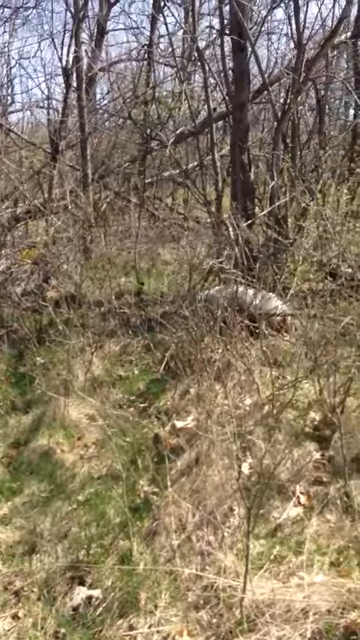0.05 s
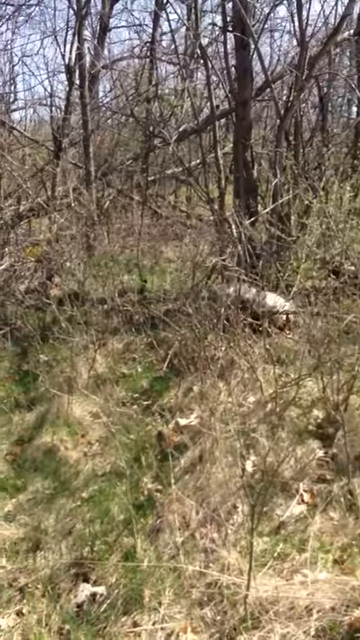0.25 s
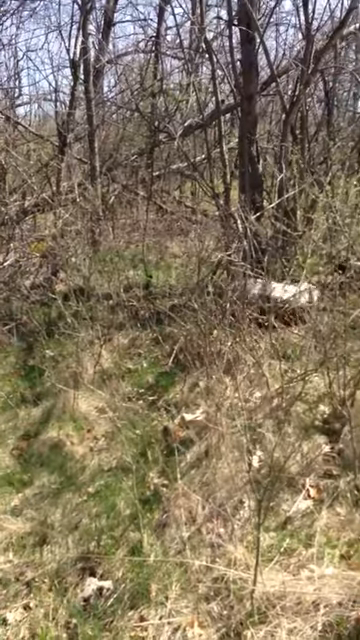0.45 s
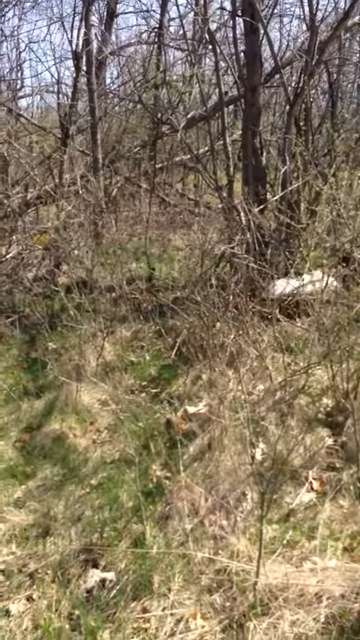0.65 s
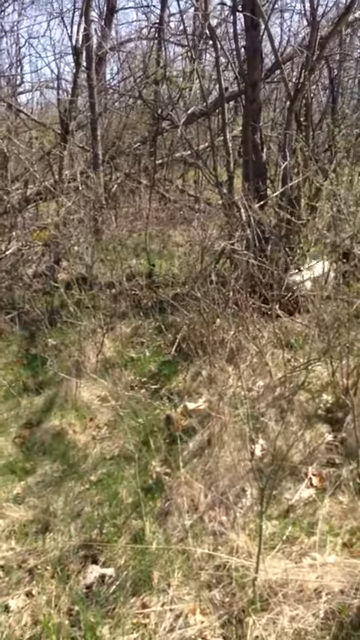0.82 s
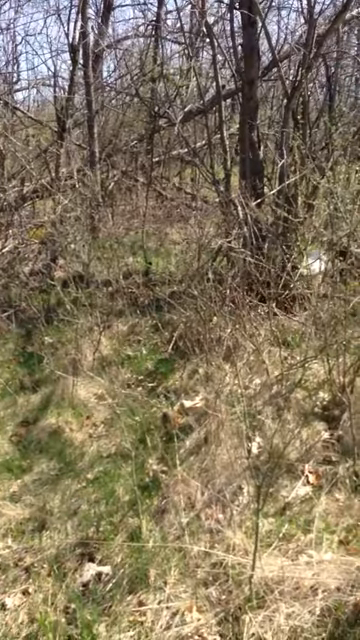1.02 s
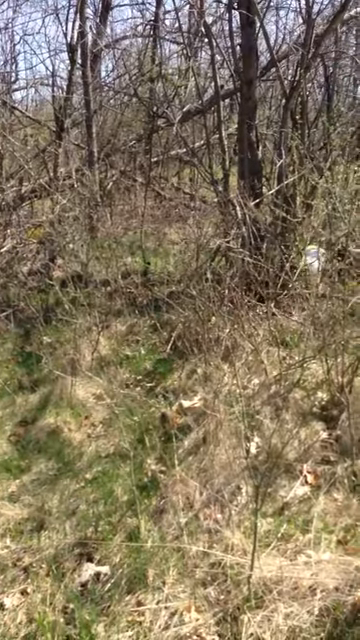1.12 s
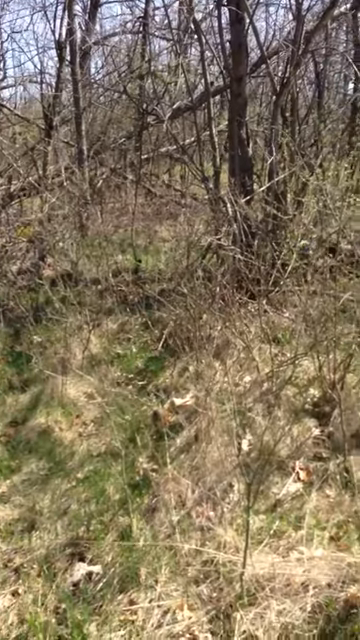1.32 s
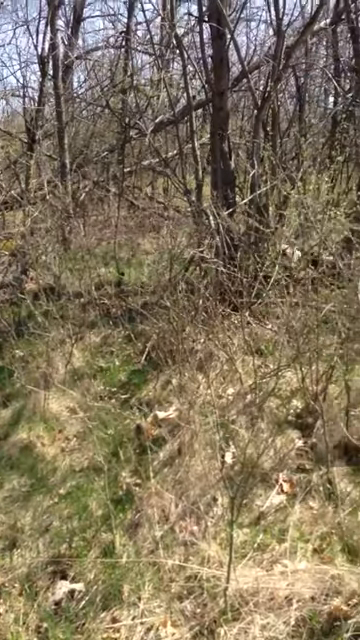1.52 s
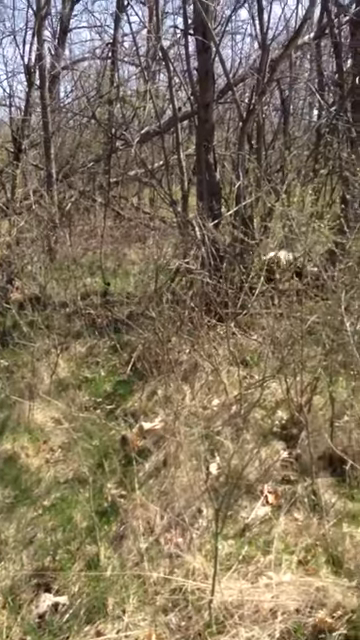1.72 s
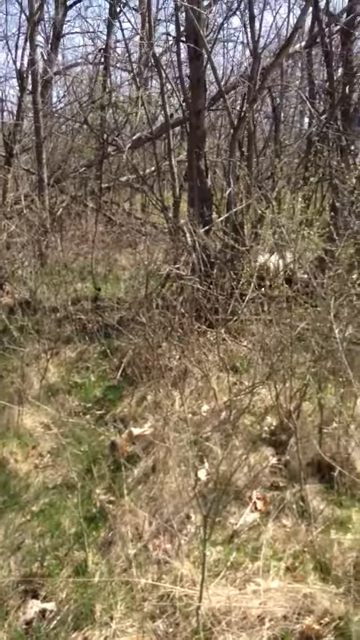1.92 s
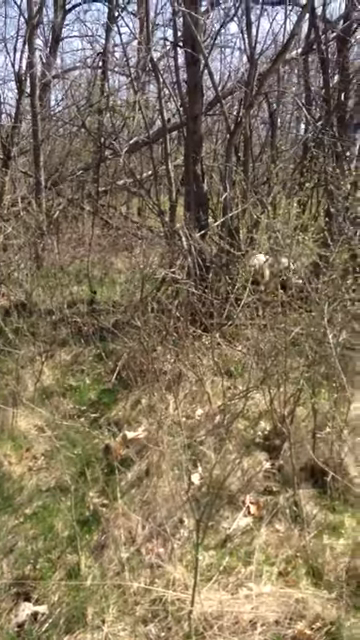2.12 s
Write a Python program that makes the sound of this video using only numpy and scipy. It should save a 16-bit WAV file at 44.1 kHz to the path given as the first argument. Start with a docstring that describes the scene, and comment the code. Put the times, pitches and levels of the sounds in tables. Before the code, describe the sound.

Dry brush crackles as a dog moves through it outdoors; a loud stick snap comes early, then a dense burst of twig ticks and crunches, thinning to sparse rustles over faint wind, heard from some distance.

```python
"""Dry leaves crackle in swells as a dog pushes through brush, each swell a stream of tiny decaying sines.
Thin twigs tick as cracks with a short ring, and one stick snaps as a set of damped modes with splinters.
Stiff stalks crunch in coarser grains; stems add a tail of scattered noise to all these breaking sounds.
Soft thumps are brief low tones, grass scuffs are dull noise, and light wind is fluttering low noise."""
import sys
import numpy as np
from scipy import signal
from scipy.fft import rfft, irfft
from scipy.io import wavfile
from scipy.ndimage import uniform_filter1d

SR = 44100
rng = np.random.default_rng(int(sys.argv[2]) if len(sys.argv) > 2 else 0)


def store_wav(level_fs):
    """Save 16-bit WAV to argv[1]."""
    pcm = np.round(np.clip(np.atleast_2d(level_fs), -1, 1) * 32767)
    wavfile.write(sys.argv[1], SR, pcm.T.astype(np.int16))


N = 94815  # length in samples

# Pushes through dry leaves: peak_s, rise_s, fall_s, level_db, treble_db (treble relative to level)
LEAF_PUSHES = [(0.028, 0.035, 0.04, -50, -1), (0.165, 0.078, 0.092, -56.5, 6.5),
               (0.325, 0.036, 0.038, -55, 2.5), (0.39, 0.011, 0.024, -54.5, 1.5),
               (0.56, 0.028, 0.039, -53, -2.5), (0.617, 0.0017, 0.0048, -40.5, -20),
               (0.642, 0.0083, 0.018, -43.5, -3), (0.683, 0.014, .01, -50, 0),
               (0.715, 0.04, 0.049, -48, -0.5), (0.779, 0.0053, 0.0098, -50, -1),
               (0.90, 0.035, .05, -51.5, 1), (0.968, 0.034, 0.028, -47, -4),
               (0.995, 0.015, 0.017, -46.5, 0.5), (1.101, 0.047, 0.03, -53, 5.5),
               (1.129, 0.031, 0.017, -52, 6), (1.314, 0.028, 0.025, -51.5, -0.5),
               (1.35, 0.018, .016, -52, -0.5), (1.45, 0.06, .025, -66, 15), (1.586, 0.056, 0.04, -53.5, 3),
               (1.776, 0.026, 0.025, -44.5, 2), (1.801, 0.015, 0.039, -46, -0.5),
               (1.855, 0.047, 0.049, -49.5, -0.5), (1.917, 0.013, 0.023, -51.5, -7),
               (2.09, 0.036, 0.056, -53.5, -3)]
# Ticking twigs: start_s, level_db (before TWIG_TRIM_DB), pitch_hz, decay_s
TWIG_TICKS = [(0.168, -39, 7000, .001), (0.5, -43, 7800, .0007), (0.529, -42, 3070, .0009),
              (0.6132, -30, 7550, .0009), (0.6178, -35.5, 4250, .0012), (0.6404, -31, 7250, .0008),
              (0.6467, -36, 5400, .0008), (0.655, -34, 6500, .0003), (.6683, -40, 4000, .0003),
              (0.6833, -31, 7600, 0.00027), (0.687, -32.5, 5030, 0.00026), (0.705, -36, 6050, .0007),
              (0.778, -43, 2300, 0.00075), (0.855, -31.5, 5700, .0007), (0.8762, -41, 7250, .0005),
              (0.902, -39, 7500, .0005), (0.9194, -36, 6840, .0003), (0.924, -37, 6900, .0004),
              (0.9803, -32, 5800, .0004), (0.991, -33, 6800, .0004), (0.998, -37, 8900, .0005),
              (1.449, -39, 6200, .0005), (1.71, -38, 7640, 0.0012), (1.778, -32.5, 4450, 0.00045),
              (1.83, -37, 4600, .0005), (1.917, -43.5, 7400, .0012), (2.033, -38.5, 11500, 0.00036),
              (2.059, -40, 6500, 0.00018), (2.085, -39.5, 5990, .0005), (2.132, -38, 4200, 0.00087)]
# Modes of the snapping stick: pitch_hz, level_db (before SNAP_DB), t60_s
STICK_MODES = [(540, -37, 0.014), (890, -28, 0.0062), (1764, -35.5, 0.027), (3030, -16.5, 0.0068),
               (4400, -12.5, 0.0085), (5420, -19.5, 0.017), (6140, 0, 0.003), (7640, -15.5, 0.0053),
               (10000, -12.5, 0.0039), (11430, -13, 0.004)]
# Stiff stalks giving way: peak_s, rise_s, fall_s, level_db, pitch_hz
STALK_CRUNCHES = [(.618, .002, .005, -44.5, 4200), (.644, 0.0089, .012, -49, 5300),
                  (.99, 0.022, .015, -49.5, 5200), (1.785, 0.023, .03, -50.5, 4500),
                  (1.835, .015, .035, -54, 5400)]
# Soft thumps on the turf: centre_s, pitch_hz, level_db, spread_s
TURF_THUMPS = [(.437, 285, -46, .0028), (.455, 191, -62, 0.0093), (.547, 169, -56, .005),
               (1.02, 181, -57, .008), (1.08, 185, -58.5, 0.014), (1.28, 165, -57, 0.0065)]
# Dull scuffs through the grass: centre_s, spread_s, level_db
GRASS_SCUFFS = [(0.488, 0.027, -62), (0.645, 0.047, -65.5), (1.16, .05, -68), (0.945, 0.051, -64.5),
                (1.803, 0.015, -58)]
# Spectrum of the dry leaves: frequency_hz, relative_level_db
LEAF_SPECTRUM = [(200, -27.5), (600, -11), (1200, -9.5), (2000, -7.5), (3000, -2.5), (4400, -1),
                 (5500, -0.5), (7100, .5), (8800, -3.5), (11500, -6), (15500, -13)]
# Spectrum of the crack of a twig: frequency_hz, relative_level_db
TWIG_CRACK_SPECTRUM = [(200, -32), (500, -11.5), (1200, -14.5), (2500, -2.5), (4500, 0.5), (6800, 0.5),
                       (8500, -4.5), (11000, 1.5), (15500, -12.5)]
# Spectrum of the stick's splintering fibres, sharing its resonances: frequency_hz, relative_level_db
FIBRE_SPECTRUM = [(200, -28), (500, -6), (1000, -7.5), (1300, -15), (1750, -5.5), (2200, -6.5), (3030, 0.5),
                  (3500, -5), (4420, 2), (4850, -3), (5410, 3.5), (7100, 3), (8500, -2.5), (11000, 2.5),
                  (15500, -10)]
# Spectrum of the brushed grass: frequency_hz, relative_level_db
GRASS_SPECTRUM = [(150, -9), (400, 0), (850, 1.5), (1400, -10), (2000, -3.5), (4000, -27)]
# Spectrum of the wind in the trees: frequency_hz, relative_level_db
WIND_SPECTRUM = [(25, -20), (60, -17), (85, -11), (130, 1.5), (185, 2.5), (260, -1), (380, -6), (600, -6.5),
                 (870, -3.5), (1400, -9), (2200, -13.5), (4500, -18), (7000, -14), (10000, -19),
                 (15500, -23)]

# Fracture grains: decay is in cycles of each grain's own pitch
GRAINS_PER_S, GRAIN_SPREAD_DB, GRAIN_DECAY_CYCLES = 8000, 3, 1.19
GRAIN_LOW_HZ, GRAIN_HIGH_HZ = 300, 16000
SCATTER_DB, SCATTER_S = -2, 0.01
# Leaves: STIR_DB is the motion that lasts between pushes
STIR_DB, TREBLE_HZ = -62.5, 8100
CLUSTERS_PER_S, CLUSTER_SPREAD_DB = 170, 1.2
# Twigs: the crack level is relative to the ring
TWIG_TRIM_DB, TWIG_CRACK_DB, TWIG_CRACK_S, TWIG_SCATTER_DB = -2, -6.5, 0.0004, -3
# Stick
SNAP_S, SNAP_DB, SNAP_ATTACK_S = 0.2228, -6, 0.00044
SPLINTER_DB, SPLINTER_RISE_S, SPLINTER_FADE_S = -27.5, 0.0029, 0.0063
SNAP_ECHO_DB, SNAP_ECHO_S = -44.5, 0.028
# Stalks: the skirt is the level an octave off the pitch
STALK_GRAINS_PER_S, STALK_SPREAD_DB, STALK_SKIRT_DB = 1500, 4.5, -18
WIND_DB, FLUTTER_DB, FLUTTER_PER_S = -60, 0.88, 35.05
LOW_CUT_HZ, TOP_HZ = 58, 15400


def undb(db):
    """The decibel law: amplitude grows tenfold for every 20 dB."""
    return 10 ** (np.asarray(db) / 20)


def unit(x):
    """Normalisation: scale a signal to an rms of 1."""
    return x / np.sqrt(np.mean(x ** 2))


def colour(x, points):
    """Spectral shaping: weight each frequency by a curve in dB over log frequency, then set rms to 1."""
    hz, db = np.array(points).T
    frequency = np.maximum(np.fft.rfftfreq(N, 1 / SR), 1)
    gain = undb(np.interp(np.log(frequency), np.log(hz), db))
    return unit(irfft(rfft(x) * gain, N))


def walk(rate):
    """Smoothed randomness: random steps, averaged twice, give a drift with an rms of 1."""
    step = max(int(SR / rate), 1)
    steps = np.repeat(rng.standard_normal(N // step + 1), step)
    smooth = uniform_filter1d(uniform_filter1d(steps, step), step)
    return unit(smooth[:N])


def fade(age, seconds):
    """Exponential decay: silent before age 0, then falling with a time constant."""
    return (age >= 0) * np.exp(-np.maximum(age, 0) / seconds)


def swell(t, at, rise, fall):
    """Two-sided exponential: a rise to a peak and a fall from it, each with its own time constant."""
    return np.exp(-np.abs(t - at) / np.where(t < at, rise, fall))


def gaussian(t, at, spread):
    """Gaussian envelope: a smooth, symmetric rise and fall; spread is the standard deviation."""
    return np.exp(-((t - at) / spread) ** 2 / 2)


def crackles(per_s, spread_db, size=96):
    """Fracture noise: many tiny breaks, each a damped sine of random time, pitch and strength."""
    out, n = np.zeros(N + size), np.arange(size)
    when, pitch, strength, phase = rng.random((int(per_s * N / SR), 4)).T[:, :, None]
    hz = GRAIN_LOW_HZ + (GRAIN_HIGH_HZ - GRAIN_LOW_HZ) * pitch
    cycles = n * hz / SR
    # many weak grains and few strong ones; sqrt(hz) offsets the shorter life of high grains
    gain = undb(-spread_db * np.log(1 - 0.995 * strength)) * np.sqrt(hz)
    ring = np.exp(-cycles / GRAIN_DECAY_CYCLES) * np.sin(2 * np.pi * (cycles + phase))
    np.add.at(out, (when * N).astype(int) + n, gain * ring)
    return out[:N]


def thicket(x, diffuse, scatter_db):
    """Diffuse scattering: stems and trunks add noise that follows the sound's decaying mean power."""
    keep = np.exp(-1 / (SCATTER_S * SR))
    power = signal.lfilter([1 - keep], [1, -keep], x ** 2)
    return x + undb(scatter_db) * diffuse * np.sqrt(power)


def leaves(t):
    """Stick-and-break friction: each push swells the crackle of leaves, in uneven clusters."""
    clusters = crackles(GRAINS_PER_S, GRAIN_SPREAD_DB) * undb(CLUSTER_SPREAD_DB * walk(CLUSTERS_PER_S))
    scattered = thicket(clusters, rng.standard_normal(N), SCATTER_DB)
    grains = colour(scattered, LEAF_SPECTRUM)
    splitter = signal.butter(2, min(TREBLE_HZ, SR / 3), fs=SR, output="sos")
    low = signal.sosfiltfilt(splitter, grains)
    high = grains - low
    # overlapping pushes add in power, apart for the body and the treble
    body_power = treble_power = undb(STIR_DB) ** 2
    for at, rise, fall, db, treble_db in LEAF_PUSHES:
        push = undb(db) * swell(t, at, rise, fall)
        body_power = body_power + push ** 2
        treble_power = treble_power + (push * undb(treble_db)) ** 2
    return low * np.sqrt(body_power) + high * np.sqrt(treble_power)


def twigs(t):
    """Impulsive fracture: a thin twig gives a broad crack and a very short damped ring."""
    out, noise = 0, colour(rng.standard_normal(N), TWIG_CRACK_SPECTRUM)
    for at, db, hz, decay in TWIG_TICKS:
        age = t - at
        ring = fade(age, decay) * np.sin(2 * np.pi * hz * age)
        crack = undb(TWIG_CRACK_DB) * noise * fade(age, TWIG_CRACK_S)
        out = out + undb(db + TWIG_TRIM_DB) * (ring + crack)
    return thicket(out, noise, TWIG_SCATTER_DB)


def snap(t):
    """Modal excitation: one break starts all the stick's modes; fibres splinter and the wood echoes."""
    age = np.maximum(t - SNAP_S, 0)
    ring = 0
    for hz, db, t60 in STICK_MODES:
        decay_db = 60 * np.minimum(age / t60, 10)
        ring = ring + undb(db - decay_db) * np.sin(2 * np.pi * hz * age)
    attack = 1 - fade(age, SNAP_ATTACK_S)
    grains = thicket(crackles(GRAINS_PER_S, GRAIN_SPREAD_DB), rng.standard_normal(N), SCATTER_DB)
    fibres = undb(SPLINTER_DB) * fade(age, SPLINTER_FADE_S) * colour(grains, FIBRE_SPECTRUM)
    echo_noise = colour(rng.standard_normal(N), FIBRE_SPECTRUM)
    echo = undb(SNAP_ECHO_DB) * fade(age, SNAP_ECHO_S) * echo_noise
    rise = 1 - fade(age, SPLINTER_RISE_S)
    return undb(SNAP_DB) * ring * attack + (fibres + echo) * rise


def stalks(t):
    """Resonant fracture: stiff stalks break in coarser grains, each crunch around its own pitch."""
    grains = crackles(STALK_GRAINS_PER_S, STALK_SPREAD_DB)
    scattered = thicket(grains, rng.standard_normal(N), SCATTER_DB)
    out = 0
    for at, rise, fall, db, hz in STALK_CRUNCHES:
        resonance = [(hz / 4, 2 * STALK_SKIRT_DB), (hz / 2, STALK_SKIRT_DB), (hz, 0), (hz * 2, STALK_SKIRT_DB)]
        out = out + undb(db) * swell(t, at, rise, fall) * colour(scattered, resonance)
    return out


def thumps(t):
    """Damped impact: soft, dull knocks, like feet settling on turf, are low tones in Gaussian envelopes."""
    out = 0
    for at, hz, db, spread in TURF_THUMPS:
        out = out + undb(db) * gaussian(t, at, spread) * np.sin(2 * np.pi * hz * (t - at))
    return out


def scuffs(t):
    """Friction noise: legs brush through the grass with a soft, dull swish."""
    swish = sum(undb(db) * gaussian(t, at, spread) for at, spread, db in GRASS_SCUFFS)
    return swish * colour(rng.standard_normal(N), GRASS_SPECTRUM)


def wind(t):
    """Turbulent noise: light wind in bare trees is a low rush with a slight, quick flutter."""
    flutter = undb(FLUTTER_DB * walk(FLUTTER_PER_S))
    return undb(WIND_DB) * colour(rng.standard_normal(N) * flutter, WIND_SPECTRUM)


def scene():
    """Superposition: the sounds of the dog in the brush add to the wind around it."""
    t = np.arange(N) / SR
    brush = leaves(t) + twigs(t) + snap(t) + stalks(t)
    return (brush + thumps(t) + scuffs(t) + wind(t))[None]


def record(dry):
    """Band limiting: the recorder cuts the deep bass gently and the top steeply."""
    low_cut = signal.butter(2, LOW_CUT_HZ, "high", fs=SR, output="sos")
    top_cut = signal.ellip(10, 0.2, 70, TOP_HZ, fs=SR, output="sos")
    return signal.sosfilt(top_cut, signal.sosfilt(low_cut, dry))


dry = scene()
out = record(dry)
store_wav(out)
```